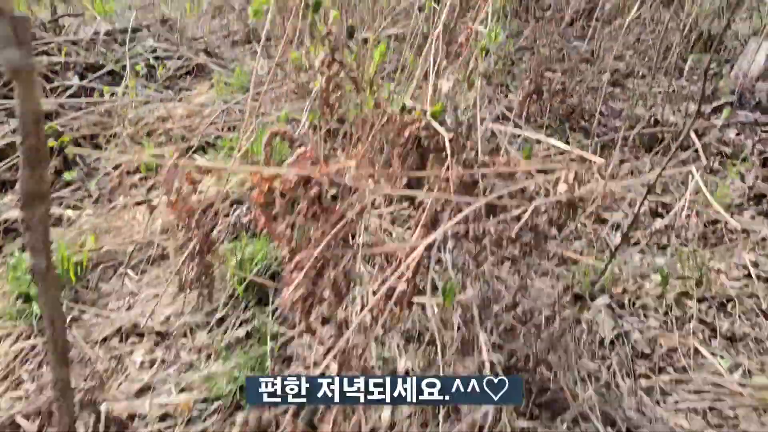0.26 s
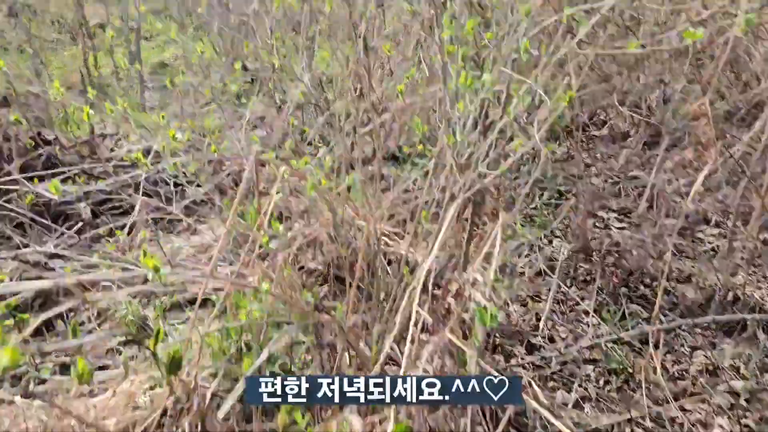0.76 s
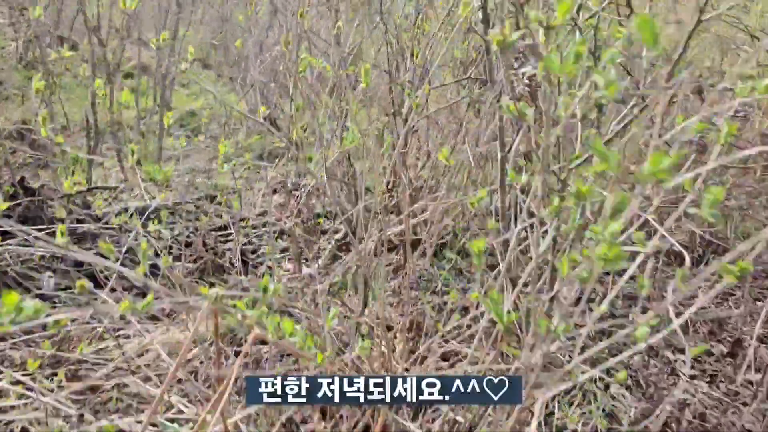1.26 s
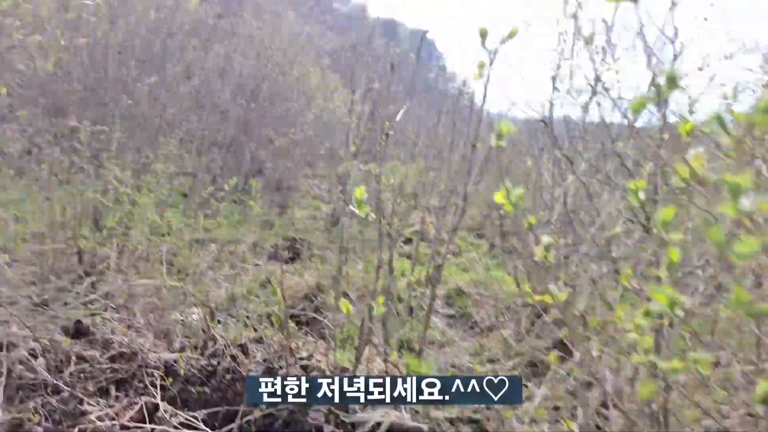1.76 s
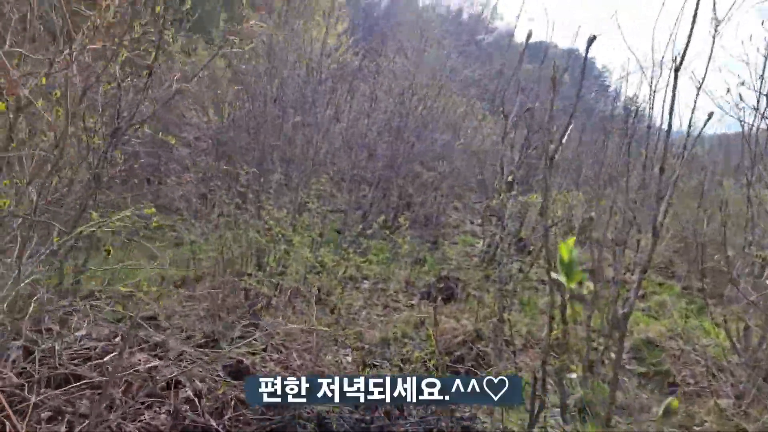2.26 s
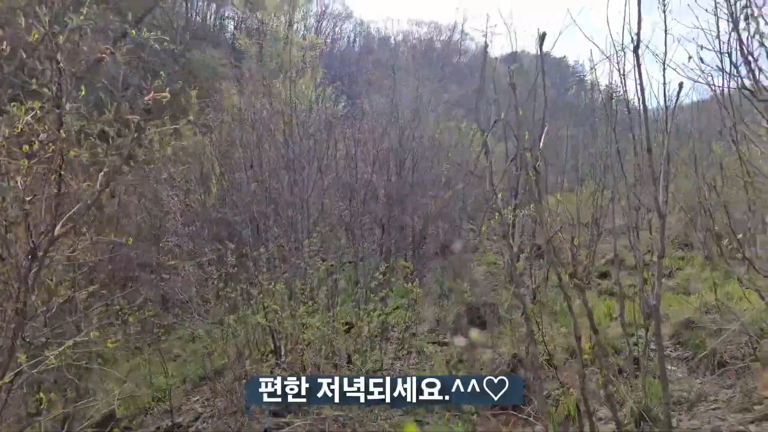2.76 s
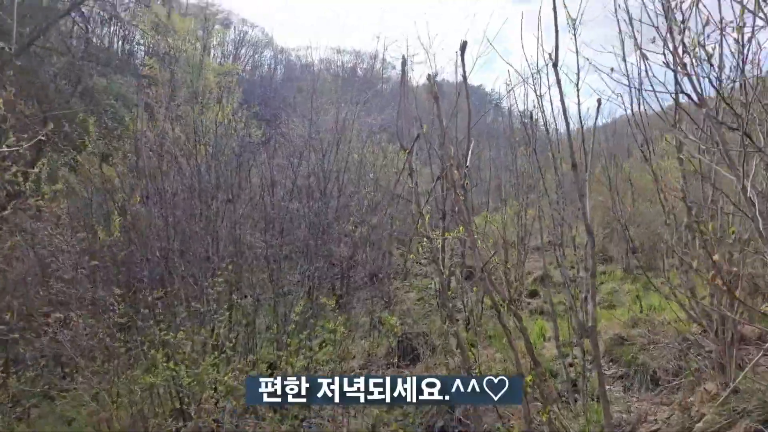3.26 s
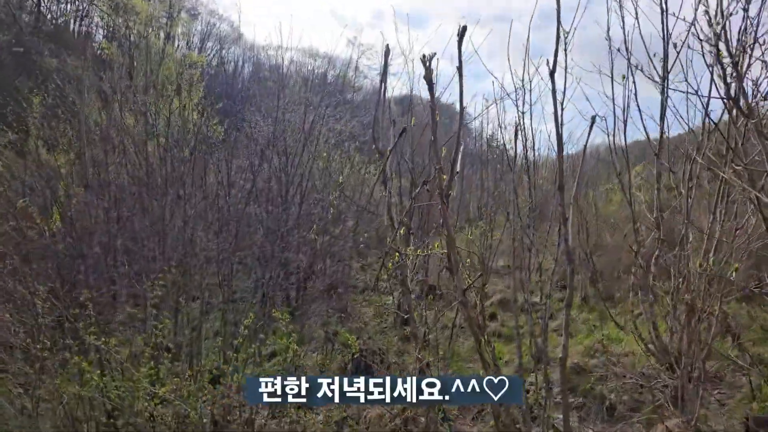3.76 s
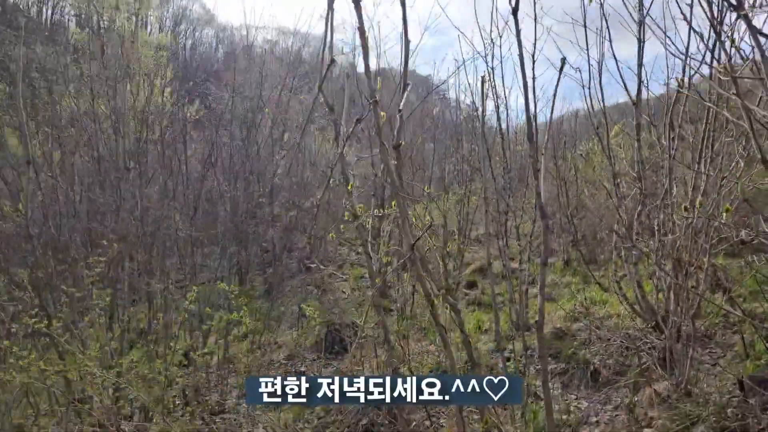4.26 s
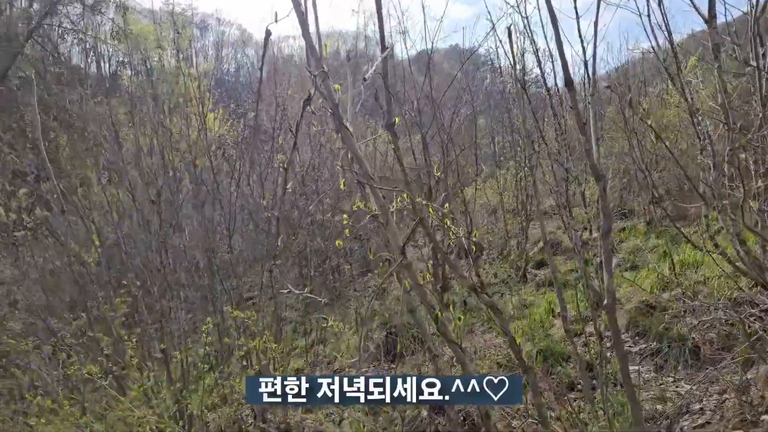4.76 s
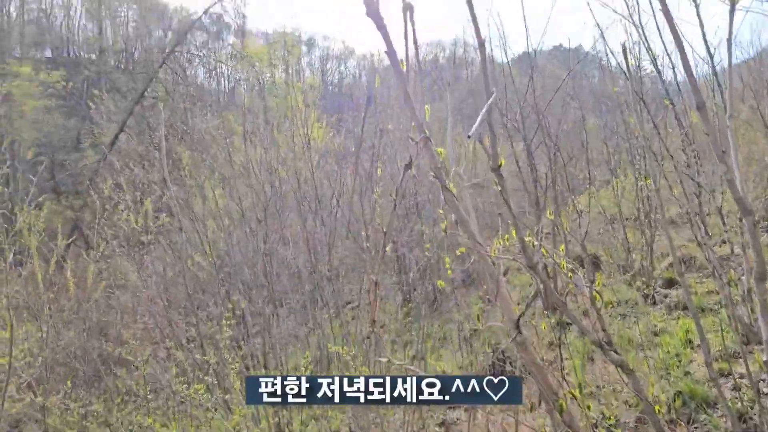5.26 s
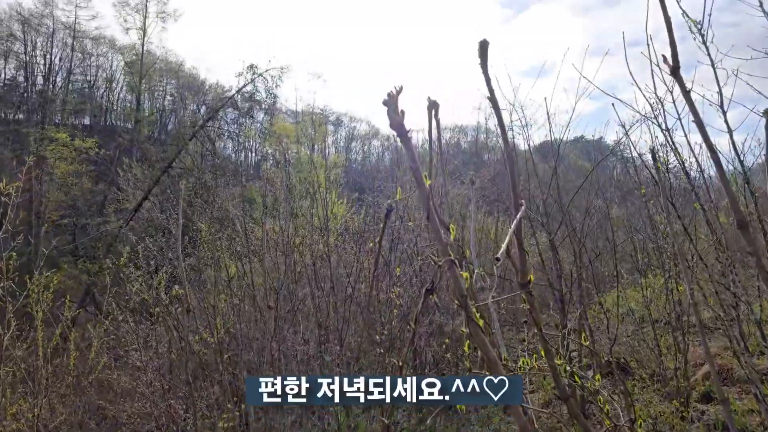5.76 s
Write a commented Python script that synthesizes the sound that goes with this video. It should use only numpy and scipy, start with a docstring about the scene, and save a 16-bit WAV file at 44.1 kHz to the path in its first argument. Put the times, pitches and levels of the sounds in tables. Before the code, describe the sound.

On a quiet open hillside, a handheld microphone moves with a walker through brittle undergrowth. Crunching litter and small stick knocks come first, with brief stalk squeaks, then a loud woody clack. Denser swishing stems follow, with distant thin bird whistles. A hard snap and heavier footfall bring a gust of rumble, then crackling thins and swells again at the end.

```python
"""Someone wades through dry leaf litter and dead brush on a quiet hillside, for about six seconds.
From the start leaves crackle, stems hiss on the left, soil grinds and twigs snap: bursts of filtered noise.
Air rumbles past now and then. Sticks soon knock with ringing modes, and boots thud as single pulses.
After half a second stalks squeak as gliding resonances; near 2.2 s one loud knock rings at several pitches,
with small knocks after it. Faint birds whistle near 3 s and 5 s; a strong snap and thud come in between."""
import sys
import numpy as np
from scipy import signal
from scipy.fft import rfft, irfft, next_fast_len
from scipy.io import wavfile
from scipy.ndimage import uniform_filter1d, map_coordinates

SR = 44100
rng = np.random.default_rng(int(sys.argv[2]) if len(sys.argv) > 2 else 0)


def wrap_up_sound(samples):
    """Save the sound to the file named by the first command line argument, as 16-bit audio."""
    columns = np.atleast_2d(samples).T
    # keep every value between -1 and 1, then stretch to whole-number steps
    tamed = np.clip(columns, -1, 1)
    steps = np.round(tamed * 32767).astype(np.int16)
    wavfile.write(sys.argv[1], SR, steps)


N = 265041  # length in samples


def gain_of(db):
    """Turns decibels into an amplitude factor."""
    return 10 ** (np.asarray(db) / 20)


def evened(x):
    """Scales a signal to an average (rms) strength of 1."""
    return x / np.sqrt(np.mean(x ** 2) + 1e-20)


def with_level(x, db, span):
    """Scales a short sound so that its energy, spread over span seconds, has this level."""
    energy = np.mean(x ** 2) * x.shape[-1]
    return x * gain_of(db) * np.sqrt(span * SR / (energy + 1e-20))


def level_curve(rows, axis=1):
    """Draws straight lines between the dB values of one column, as a gain for every sample."""
    rows = np.array(rows)
    return gain_of(np.interp(np.arange(N) / SR, rows[:, 0], rows[:, axis]))


def swells(rows, axis=3):
    """Adds up movements, each 10 dB down one build time before its peak and one fade time after."""
    swell_shape = 1.5  # 1 = pointed crest, 2 = round
    step = 32  # samples between computed values
    t = np.arange(N)[::step] / SR
    power = np.zeros(N)
    for row in rows:
        peak_s, build_s, fade_s = row[:3]
        away = np.maximum((peak_s - t) / build_s, (t - peak_s) / fade_s)
        level_db = row[axis] - 10 * abs(away) ** swell_shape
        power += np.repeat(gain_of(level_db) ** 2, step)[:N]
    return np.sqrt(power)


def sides(lean_db):
    """Left and right gains of mean power 1; a positive lean makes the left louder."""
    return evened(gain_of([[lean_db / 2], [-lean_db / 2]]))


def coloured(x, points):
    """Filters a sound by a curve of Hz and dB points, and scales it to rms 1."""
    hz, db = np.transpose(points)
    size = next_fast_len(x.shape[-1])
    f = np.fft.rfftfreq(size, 1 / SR)
    curve = gain_of(np.interp(np.log(f + 1), np.log(hz), db))
    return evened(irfft(rfft(x, size) * curve, size)[..., :x.shape[-1]])


def add(mix, s, sound):
    """Mixes a sound in at time s, cutting it where the scene ends."""
    part = mix[:, max(round(s * SR), 0):][:, :sound.shape[-1]]
    part += sound[..., :part.shape[1]]


def fractures(per_s, spread_db, life, port_lag, count=16):
    """Swarms of tiny breaks: each place has its own ring and its own lag between left and right."""
    t = np.arange(256) / SR
    out = np.zeros((2, N))
    for place in np.linspace(-1, 1, count):
        size_db = spread_db * np.minimum(rng.exponential(1, N), 4.5)
        size = gain_of(size_db) * rng.choice([-1, 1], N)
        clicks = size * (rng.random(N) < per_s / count / SR)
        ring = evened(rng.standard_normal(len(t)) * np.exp(-t / life))
        grains = signal.oaconvolve(clicks, ring)[:N]
        lagged = np.roll(grains, round(place * port_lag * SR))
        out += sides(4 * place) * np.array([grains, lagged])
    return evened(out)


def clumps(depth_db, span):
    """Breaks come in bunches: a gain that wanders at random."""
    knots = np.arange(0, N / SR + .1, span)
    wander = np.interp(np.arange(N) / SR, knots, rng.standard_normal(len(knots)))
    return evened(gain_of(depth_db * wander))


def shifting(x, depth_db, width_hz, span):
    """Random patches of louder and softer sound drift across time and pitch."""
    hz, t, z = signal.stft(x, SR, nperseg=512)
    field = rng.standard_normal((400, 1500))
    where = np.meshgrid(hz / width_hz, t / span, indexing="ij")
    patches = map_coordinates(field, where, order=1, mode="wrap")
    return evened(signal.istft(z * gain_of(depth_db * patches), SR, nperseg=512)[1][:, :N])


# Hush of the quiet hillside. Each row: pitch in Hz, strength in dB.
HILLSIDE = [(20, -28), (100, -33), (220, 8), (600, 12), (1500, 9), (5000, -12), (16000, -33)]
# Rumble of moving air. Each row: pitch in Hz, strength in dB.
AIR = [(10, 5), (28, -2), (45, 1.5), (62, 2.5), (80, -1.5), (110, 1), (200, -15.5), (600, -58), (2000, -90)]
# Air pushed past the microphone as the body moves.
# Each row: peak in seconds, build in seconds, fade in seconds, level in dB before the mix gain.
GUSTS = [(.13, 0.073, .12, -48), (.6, 0.19, 0.2, -38.5), (1.11, 0.067, 0.12, -38.5),
         (1.22, 0.027, 0.034, -39.5), (1.42, .1, .12, -60), (2.03, 0.072, .14, -48.5),
         (2.52, 0.046, 0.26, -48), (2.83, 0.29, 0.066, -45.5), (3.1, 0.018, 0.022, -46),
         (3.51, 0.16, 0.12, -51), (4.475, 0.02, 0.044, -39.5), (4.66, 0.046, .08, -35),
         (4.79, 0.051, 0.043, -27), (4.9, 0.043, 0.044, -41), (5.06, 0.033, 0.078, -52)]


def air():
    """Gusts rumble partly independently at left and right, over the steady hush of the hillside."""
    gusts, hush = rng.standard_normal((2, 3, N))
    # the third noise of each is shared by both sides
    rumble = coloured(gusts[:2] + 0.36 * gusts[2], AIR) * swells(GUSTS) * sides(3)
    steady_hush = coloured(hush[:2] + hush[2], HILLSIDE)
    return gain_of(-11.5) * rumble + gain_of(-62.0) * steady_hush


# Lasting contact with the brush, as points on a curve.
# Each row: time in seconds, leaf crackle in dB, hiss of close stems in dB, both before the mix gains.
CONTACT = [(0.0, -49, -51.5), (0.76, -43, -44.5), (0.94, -51.5, -58), (1.2, -48.5, -44), (1.6, -57, -47),
           (1.85, -37.5, -35), (2.75, -48.5, -37), (2.94, -45.5, -41.5), (3.22, -40, -36.5),
           (3.72, -39, -32.5), (4.22, -43, -37), (4.95, -37.5, -35), (5.24, -47, -47.5), (5.55, -44, -56),
           (5.64, -58, -50), (6.01, -36, -37)]
# Stems bending and sweeping past the body. Each row: peak in seconds, build in seconds, fade in seconds,
# then leaf crackle, stem hiss and litter crunch in dB before the mix gains.
SWEEPS = [(0.417, 0.035, 0.03, -32.5, -41, -33), (0.54, 0.12, 0.12, -39, -46, -45),
          (0.66, 0.085, 0.082, -52, -50, -37.5), (1.338, 0.07, 0.036, -35.5, -38, -40.5),
          (1.44, 0.015, 0.17, -39.5, -50, -42.5), (1.71, 0.044, 0.15, -39, -35.5, -46.5),
          (1.92, 0.029, 0.043, -39, -31, -45), (2.35, 0.076, 0.06, -38, -36, -43.5),
          (2.52, 0.029, 0.047, -32.5, -27.5, -45), (2.7, 0.23, 0.17, -36, -36, -44),
          (3.03, 0.024, 0.065, -47, -31, -50), (3.4, 0.076, 0.14, -33, -39, -41.5),
          (3.64, 0.049, 0.25, -38, -32, -53), (3.85, 0.049, 0.097, -41, -29, -63),
          (4.03, 0.023, 0.025, -54, -33, -68), (4.39, 0.12, 0.12, -36.5, -39, -44),
          (4.49, 0.023, 0.11, -33, -35, -48), (4.6, 0.026, 0.11, -29, -31, -38.5),
          (4.8, 0.12, 0.06, -32.5, -37, -40), (5.13, 0.092, 0.068, -49, -51, -46),
          (5.43, 0.16, 0.04, -51, -42, -46.5), (5.558, 0.027, 0.04, -39, -41, -39.5),
          (5.95, 0.17, 0.34, -34.5, -45, -43.5)]
# Bunches of leaves collapsing at once.
# Each row: peak in seconds, fade in seconds, leaf crackle in dB, stem hiss in dB before the mix gains.
CRUSHES = [(0.119, 0.068, -41.5, -40), (.276, 0.072, -43.5, -57), (.385, 0.033, -43, -42),
           (.805, 0.076, -42, -47), (1.066, 0.045, -38, -40), (1.138, 0.038, -43.5, -55),
           (1.409, 0.075, -35.5, -40), (1.618, 0.014, -42.5, -43), (1.985, 0.054, -36, -34),
           (2.066, 0.052, -38.5, -40), (2.212, 0.1, -36.5, -36), (2.297, 0.022, -41, -36),
           (4.906, 0.029, -32.5, -55), (5.264, 0.017, -41.5, -45)]


def rustle_levels():
    """Gains of leaves, stems and litter: sweeps and crushes on top of the lasting contact."""
    crush_build_s, crush_litter_db, contact_litter_db = 0.014, -5.5, -12  # dB relative to the leaves
    moves = list(SWEEPS)
    for s, fade_s, leaf_db, hiss_db in CRUSHES:
        moves.append((s, crush_build_s, fade_s, leaf_db, hiss_db, leaf_db + crush_litter_db))
    leaves, stems = level_curve(CONTACT, axis=1), level_curve(CONTACT, axis=2)
    litter = leaves * gain_of(contact_litter_db)
    return (np.hypot(leaves, swells(moves, axis=3)),
            np.hypot(stems, swells(moves, axis=4)),
            np.hypot(litter, swells(moves, axis=5)))


# Colour of crackling leaves. Each row: pitch in Hz, strength in dB.
LEAF = [(1500, -28), (2400, -17.5), (3000, -5), (4500, -2.5), (6500, 1), (8500, -2), (10500, -3.5),
        (11500, -13), (13000, -4)]
# Colour of hissing stems. Each row: pitch in Hz, strength in dB.
STEMS = [(9000, -35), (11000, -13.5), (12000, -1.5), (13000, -7.5), (14500, -8.5), (15600, -11),
         (17000, 1.5)]
# Colour of packed litter, also lent to low wood sounds. Each row: pitch in Hz, strength in dB.
LITTER = [(400, -16), (750, -4), (1000, -4), (1400, -0.5), (1900, 2.5), (2600, 2.5), (3200, -3), (5000, -6)]


def brush():
    """Leaves crackle, close stems add an even sizzle on the left, and packed litter crunches lower down."""
    leaf_gain, stem_gain, litter_gain = rustle_levels()
    breaks = fractures(per_s=3500, spread_db=3.4, life=.00025, port_lag=.0004) * clumps(1.2, .004)
    # brittle leaf edges give separate, very short ticks
    ticks = fractures(per_s=330, spread_db=3.3, life=.00007, port_lag=.0003)
    rubbing = rng.standard_normal((2, N))
    crackle = shifting(breaks + .6 * rubbing + .33 * ticks, depth_db=2.8, width_hz=280, span=.02)
    sizzle = shifting(.6 * breaks + rubbing + .25 * ticks, depth_db=1.3, width_hz=200, span=.03)
    leaves = coloured(crackle, LEAF) * leaf_gain * sides(0.54)

    # the more the close scraping outweighs the leaves, the further left it lies
    closeness_db = 20 * np.log10(stem_gain / leaf_gain)
    right = gain_of(-np.clip(19.0 + 1.5 * closeness_db, 2, 12))
    stem_sides = np.array([np.ones(N), right]) * np.sqrt(2 / (1 + right ** 2))
    stems = coloured(sizzle, STEMS) * stem_gain * stem_sides

    crushed = fractures(per_s=800, spread_db=3.0, life=0.0007, port_lag=0.00008)
    crushed = shifting(crushed + 0.6 * crackle, depth_db=3.5, width_hz=200, span=.025)
    litter = coloured(crushed, LITTER) * litter_gain * sides(0.71)
    return gain_of(-0.55) * leaves + gain_of(6.0) * stems + gain_of(-3.5) * litter


# Colour of soft soil. Each row: pitch in Hz, strength in dB.
SOIL = [(40, -66), (75, -24), (125, -6.5), (200, 3.5), (300, 0.5), (420, 1), (680, -5), (900, -13.5),
        (1600, -9), (4000, -21)]
# Weight rolling onto a foot.
# Each row: peak in seconds, build in seconds, fade in seconds, soil level in dB before the mix gain.
STEPS = [(.12, 0.035, 0.13, -55.5), (.28, 0.017, 0.044, -50), (.4, 0.019, 0.077, -52),
         (.58, 0.16, 0.09, -43.5), (.74, 0.048, 0.024, -39), (.85, 0.23, 0.19, -47.5),
         (1.075, 0.014, 0.058, -46), (1.32, 0.093, 0.25, -53), (1.76, 0.16, 0.079, -52),
         (2.7, 0.39, 0.29, -52), (3.43, 0.2, 0.28, -48.5), (4.49, 0.065, 0.041, -49),
         (4.77, 0.2, 0.031, -51), (5.12, 0.13, 0.29, -56), (6.0, 0.13, .1, -59)]
# Heels and soles landing. Each row: time in seconds, level in dB over 12 ms, centre pitch in Hz.
THUDS = [(0.389, -40.5, 254), (0.572, -52, 446), (0.726, -43, 420), (0.7384, -42.5, 365), (.918, -49, 400),
         (1.0729, -40.5, 357), (1.5113, -48, 483), (1.9815, -48.5, 407), (2.6908, -37, 456),
         (2.745, -43, 454), (3.1062, -45, 430), (3.3585, -46, 302), (3.425, -42.5, 286), (3.5, -40.5, 232),
         (3.549, -45, 176), (4.4686, -46, 342), (4.4871, -42.5, 413), (4.753, -43.5, 450),
         (4.7644, -30, 420), (4.805, -43.5, 230), (5.048, -48, 191), (5.1154, -47, 384)]


def boots():
    """Soft soil grinds under the sole; each landing is one dead push of air, then the earth settles."""
    contact_soil_db = -17.5  # soil stirred along with the leaves, relative to their contact level
    clods = fractures(per_s=900, spread_db=1.6, life=0.0004, port_lag=0.00025, count=12)
    grind = coloured(shifting(clods, depth_db=3.8, width_hz=131, span=.025), SOIL)
    stirred = gain_of(contact_soil_db) * level_curve(CONTACT)
    out = gain_of(-1.5) * grind * np.hypot(swells(STEPS), stirred)
    lead = .005  # seconds of sound before the centre of the push
    age = np.arange(3000) / SR - lead
    for s, db, hz in THUDS:
        u = np.pi * hz * age
        push = (1 - 2 * u ** 2) * np.exp(-u ** 2)
        fade = np.exp(-np.maximum(-age / 0.00089, age / 0.01))
        settle = coloured(rng.standard_normal(len(age)), SOIL) * fade
        add(out, s - lead, with_level(.2 * settle - push, db, .012))
    return out


# Twigs and stalks breaking. Each row: time in seconds, level of the leaf-coloured part in dB over 5 ms
# before the mix gain, woody low part in dB relative to it, splintery top in dB relative to it,
# lean in dB (positive is left; the top gets a further fixed lean), time to split in seconds.
SNAPS = [(0.0333, -40.5, -16, 6.5, 0, 0.003), (0.082, -42, -4.5, -5, -1, 0.0021),
         (0.1168, -40, -11, 15, -11, 0.0041), (0.1234, -45, -12, 10, -4, 0.0014),
         (0.1498, -42.5, -18, 16, 0, 0.0017), (0.1755, -36.5, -6.5, 9, -1, 0.0002),
         (0.271, -39, -13, -11, 1, 0.0014), (0.281, -41, -2, -6, 7, 0.003),
         (0.4168, -30.5, -8, 12, -9, 0.0009), (.4245, -41, -8, 6, -4, 0.00091),
         (.4305, -41, -6, 3, -3, .0006), (0.5439, -36, -29, 11, -3, 0.0013), (.6405, -43, -3, 0, -3, .0007),
         (0.674, -28.5, -32, 2, -5, 0.0022), (0.7905, -41, -22, 6, 1, 0.00093),
         (0.803, -33.5, -32, 9, -5, 0.0025), (0.8766, -40, -26, -13, -18, 0.0013),
         (0.992, -48, -14, 2, -3, 0.00065), (1.063, -46, -11, -7, -13, 0.003),
         (1.139, -48, -4, 2, -7, .002), (1.2918, -35.5, -22, 6, -16, 0.0021),
         (1.3255, -44, -11, 3, -10, 0.0017), (1.338, -39, -12, 3, -6, .002),
         (1.346, -47, -15, 3, -12, .001), (1.4144, -48, -10, 6, -2, .001),
         (1.4313, -30.5, -25, 2, -9, 0.0014), (1.4623, -42, -20, 12, -9, 0.0011),
         (1.5098, -41, 2, -4, -3, 0.00094), (1.981, -31, -13, 10, 10, 0.00026),
         (1.9824, -31, -13, 17, 4, .0016), (2.0631, -30, -13, 13, 5, 0.0008),
         (2.066, -36, -14, 12, 0, .002), (2.1032, -40, -34, 18, 6, .0007), (2.2063, -40, -25, 21, 2, .0008),
         (2.21, -42, -8, 4, -2, 0.0012), (2.23, -41, -7, 7, 2, .003), (2.2466, -50, -11, 3, 2, .002),
         (2.2615, -47, -13, 2, 3, 0.0019), (2.2952, -33.5, -26, 11, 3, 0.0006),
         (2.486, -37, -16, 16, -1, 0.0041), (2.5084, -36.5, -26, 20, 4, 0.001),
         (2.525, -35, -32, 18, 6, 0.00042), (2.6044, -34.5, -14, 17, 11, 0.002),
         (2.6903, -31.5, -10, -14, -6, 0.0037), (2.8272, -38.5, -2.5, 13.5, 3, 0.0058),
         (3.1062, -34, -5.5, -7, 23, 0.0004), (3.1837, -37, -14, 12, 16, 0.0008),
         (3.426, -35, -10, -4, 0, 0.0025), (3.5424, -45, 0.5, 13, 8, .0004),
         (3.6162, -36, -3.5, -4, 15, 0.00034), (3.863, -33.5, -28, 6, 5, 0.0028),
         (3.984, -57, -40, 33, 8, 0.0018), (4.4428, -32, -22, 2, 3, 0.0012),
         (4.4691, -21.5, -15.5, 7, 7, 0.0016), (4.5004, -32, -32, 15.5, 10, 0.0008),
         (4.555, -35.5, -29, 12, 5, 0.0013), (4.568, -39, -25, 22, 5, .0005),
         (4.5835, -44, -27, 24, 10, .0005), (4.604, -28, -14, 16, 3, 0.00077),
         (4.6074, -29, -16, 16, 0, .0005), (4.655, -43, -27, 22, 12, .0012),
         (4.7229, -32.5, -18, 4, -1, 0.00028), (4.793, -36, -9, 4, 8, 0.0022),
         (4.8884, -47, -23, 6, 4, .0004), (4.9308, -29.5, -33, 16, 0, 0.0017),
         (5.034, -47, -22, 24, 5, .0006), (5.2593, -40.5, -3.5, 0, -2, .0025),
         (5.356, -34.5, -12.5, 5, 5, 0.0038), (5.4901, -32, -23, 6, -3, 0.0011),
         (5.4923, -36.5, -9.5, 3, 6, 0.00081), (5.508, -46, -14, 3, 0, .001),
         (5.5438, -43, -12, 18, 7, .001), (5.5632, -34.5, -13, 2, 3, 0.0015),
         (5.685, -46.5, -30, 10, 10, 0.00099), (5.804, -40, -17, 0, 6, .0015),
         (5.8535, -36.5, -23, -1, 3, 0.0011), (5.8957, -24, -27, 8, 1, 0.0021),
         (5.952, -37, -24, 7, 0, 0.0014)]


def snaps():
    """A twig gives way in a brief burst of splitting fibres; the splinters rattle on briefly."""
    t = np.arange(2048) / SR
    out = np.zeros((2, N))
    lead = .003  # seconds of sound before the break
    age = t - lead
    rattle = gain_of(-23) * np.exp(-abs(age) / .005) * (age > 0)
    for s, db, low_db, top_db, lean_db, split_s in SNAPS:
        # the build-up takes 0.45 of the time of the decay
        split = np.exp(-np.maximum(-age / .45, age) / max(split_s, 1 / SR))
        noise = rng.standard_normal((3, len(t)))
        unevenness = gain_of(4 * np.repeat(rng.standard_normal(64), 32))
        fibres = (noise[:2] + .6 * noise[2]) * (split + rattle * unevenness)
        # every twig has its own resonances
        twig = np.transpose([np.geomspace(900, 16000, 22), 2 * rng.standard_normal(22)])
        fibres = coloured(fibres, twig)
        # the final break is one sharp jolt of the wood, alike on both sides
        jolt = evened(np.exp(-abs(age) / .00005))
        wood = gain_of(low_db) * coloured(fibres + jolt, LITTER)
        splinters = gain_of(top_db) * coloured(fibres, STEMS) * sides(lean_db + 26.0)
        crack = coloured(fibres, LEAF) * sides(lean_db) + splinters + wood
        add(out, s - lead, crack * gain_of(db) * np.sqrt(.005 * SR / len(t)))
    return gain_of(1.8) * out


# How a dry stick rings. Each row: multiple of the row's base pitch in KNOCKS, strength in dB,
# factor on the ring time.
STICK = [(1.001, 20.5, 1), (1.13, 6, 0.76), (1.27, -3.5, 1), (1.611, 3, 0.99), (2.02, 8, 1), (2.3, 1.5, 1)]
# Sticks knocking; rows at nearly the same time are pitches of one knock.
# Each row: time in seconds, level in dB over 10 ms, base pitch in Hz,
# base time in seconds to ring down by 60 dB, grating of the bark in dB relative to the ring.
KNOCKS = [(0.2807, -35.5, 1292, 0.09, -13), (.283, -45, 832, 0.13, -13), (0.2807, -36.5, 3070, 0.046, -8),
          (.318, -46, 835, 0.14, -22), (.386, -43.5, 930, 0.045, -3), (0.4168, -33.5, 1210, 0.018, 0),
          (.499, -43, 1590, .02, 5), (.635, -46, 2170, .035, -5), (.712, -48, 1220, 0.027, -2),
          (1.333, -46.5, 1830, .018, -3), (2.2093, -28.5, 1863, 0.022, -5),
          (2.2098, -27.5, 2820, 0.033, -10), (2.2095, -33.5, 3870, 0.042, -17), (2.211, -50, 805, 0.1, -10),
          (2.2185, -40, 1740, .03, -2), (2.2343, -46, 1750, .02, 0), (2.2455, -45, 812, 0.12, -7),
          (2.2472, -43, 2400, 0.02, 2), (2.247, -42, 4380, .04, -5), (2.2605, -44, 2000, .02, -4),
          (2.288, -47.5, 960, 0.027, -3), (4.7622, -38, 1335, 0.024, -16), (4.7628, -47, 610, 0.019, -18),
          (4.7715, -40.5, 1380, .022, -4), (4.802, -42.5, 744, 0.068, -5), (4.9058, -46, 2180, 0.015, 2),
          (5.2595, -33, 1947, 0.04, -9), (5.26, -43, 2450, .033, -7), (5.547, -45.5, 2120, .015, -2),
          (5.5618, -39, 2250, 0.022, -10), (5.5625, -36, 2880, .025, -4.5),
          (5.8008, -43.5, 2006, 0.046, -12), (5.802, -43.5, 2520, 0.027, -12),
          (5.9517, -39, 2450, 0.018, -11)]


def knocks():
    """A struck stick rings in a few bending modes, the upper ones never long; bark grates at the contact."""
    mode_scatter_db, grate_fade_s = 4, 0.0096  # no two sticks ring alike; the bark grates only briefly
    t = np.arange(7000) / SR
    out = np.zeros((2, N))
    for s, db, hz, t60, grate_db in KNOCKS:
        ring = np.zeros((2, len(t)))
        for k, (multiple, mode_db, life) in enumerate(STICK):
            mode_t60 = life * (min(t60, .07) if k else t60)
            phase = rng.random() + 0.11 * rng.standard_normal((2, 1))
            own_db = mode_scatter_db * rng.standard_normal()
            fade = gain_of(mode_db + own_db - 60 * t / mode_t60)
            ring += fade * np.sin(2 * np.pi * (hz * multiple * t + phase))
        noise = rng.standard_normal((3, len(t)))
        catches = gain_of(5 * np.repeat(rng.standard_normal(len(t) // 20), 20))
        rough = (0.35 * noise[:2] + noise[2]) * catches * np.exp(-t / grate_fade_s)
        grate = coloured(rough, LITTER) * (t < .1)
        blow = evened(ring * (1 - np.exp(-t / .0005))) + gain_of(grate_db) * grate
        add(out, s, with_level(blow, db, .01) * sides(1.0))
    return out


# Stalks dragging over each other with a hoarse squeak.
# Each row: start in seconds, length in seconds, first pitch in Hz, last pitch in Hz, level in dB.
SCRAPES = [(0.593, 0.09, 1780, 1550, -50), (0.616, 0.043, 2070, 2280, -48), (0.686, 0.052, 2280, 2100, -55),
           (0.802, 0.063, 1220, 1130, -55.5), (0.854, 0.034, 1040, 890, -54),
           (1.31, 0.075, 1477, 1720, -49.5), (2.221, 0.024, 2860, 2830, -42),
           (5.533, 0.047, 2030, 2240, -52)]


def scrapes():
    """Uneven slips excite a stalk whose resonance moves with the point of contact."""
    width_hz, slips_per_s = 100, 840
    out = np.zeros((2, N))
    r = np.exp(-np.pi * width_hz / SR)
    for s, length, first_hz, last_hz, db in SCRAPES:
        n = round(length * SR)
        slips = (rng.random(n) < slips_per_s / SR) * (1 + .5 * rng.standard_normal((2, n)))
        # turning the signal with the pitch lets one fixed filter follow the glide
        turn = np.exp(2j * np.pi * np.cumsum(np.geomspace(first_hz, last_hz, n)) / SR)
        ring = (turn * signal.lfilter([1 - r], [1, -r], slips / turn)).real
        ring = coloured(ring, [(400, -30), (1200, 0), (3000, 0), (8000, -10)])
        add(out, s, evened(ring * signal.windows.tukey(n, .7)) * gain_of(db))
    return out


# Bird calls: two high falling ones and two low ones, each a list of points along the call.
# Each row of a call: time in seconds, pitch in Hz, level in dB before the mix gain.
BIRD = [
    [(2.905, 5470, -54), (2.917, 5340, -32), (2.932, 5500, -52), (2.944, 5400, -42), (2.955, 4900, -30),
     (2.968, 4800, -50)],
    [(3.04, 6500, -42), (3.052, 5920, -30), (3.07, 5370, -30), (3.11, 4920, -27), (3.138, 4380, -29.5),
     (3.15, 4180, -47)],
    [(2.95, 1760, -45), (2.99, 1670, -43), (3.025, 1770, -49)],
    [(4.97, 1795, -47), (5.06, 1697, -51), (5.13, 1776, -46), (5.22, 1690, -48)],
]


def bird():
    """Thin whistles glide in pitch, fluttering on their way through the branches."""
    flutter_db = 1.2
    out = np.zeros((2, N))
    for call in BIRD:
        s, hz, db = np.transpose(call)
        t = np.arange(s[0], s[-1], 1 / SR)
        quaver, flutter = evened(uniform_filter1d(rng.standard_normal((2, len(t))), size=120))
        pitch = np.interp(t, s, hz) + 40 * quaver
        level = gain_of(np.interp(t, s, db) + flutter_db * flutter)
        level = level * signal.windows.tukey(len(t), .15)
        whistle = np.sqrt(2) * np.sin(2 * np.pi * np.cumsum(pitch) / SR)
        add(out, s[0], whistle * level)
    return out


def thicket(x, t60):
    """Ground and stems scatter a short, faint tail: the sound is smeared by fading noise."""
    t = np.arange(SR // 4) / SR
    tail = rng.standard_normal((2, len(t))) * gain_of(-60 * t / t60) * (t > .004)
    return signal.oaconvolve(x, tail / np.linalg.norm(tail[0]), axes=1)[:, :N]


def scene():
    """All sources around the walker; the birds are further off, so more of their sound is scattered."""
    sharp = snaps() + knocks()
    song = bird()
    scattered = thicket(gain_of(-18) * sharp + gain_of(-15) * song, t60=.12)
    return air() + brush() + boots() + sharp + scrapes() + gain_of(-15.0) * song + scattered


def record(dry):
    """The recorder's band limit: a low-pass filter removes the highest treble."""
    edge_hz = 15750
    low_pass = signal.firwin(301, edge_hz, window=("kaiser", 8), fs=SR)
    return signal.oaconvolve(dry, low_pass[None], "same")


dry = scene()
out = record(dry)
wrap_up_sound(out)
```